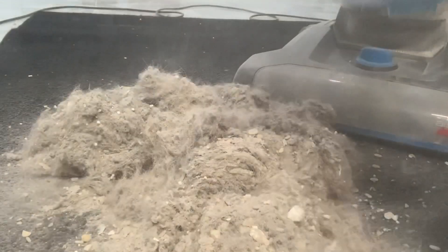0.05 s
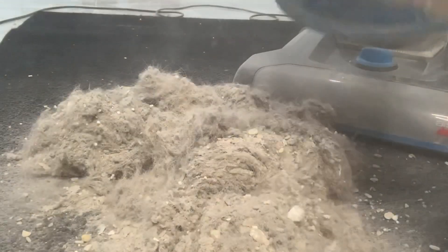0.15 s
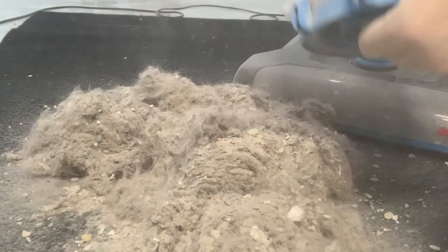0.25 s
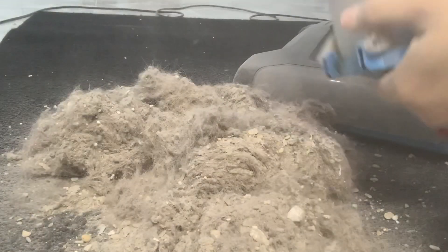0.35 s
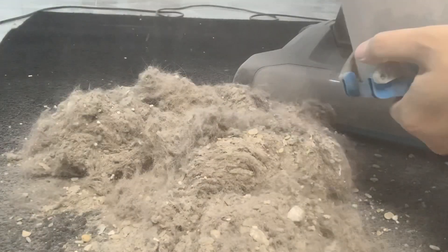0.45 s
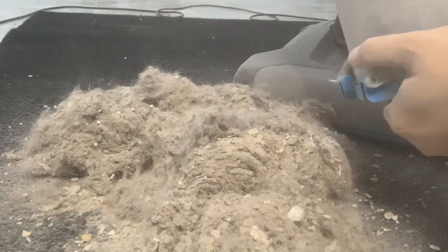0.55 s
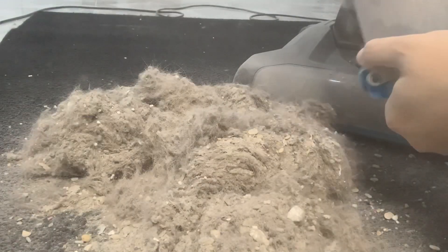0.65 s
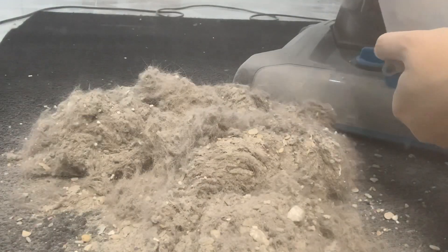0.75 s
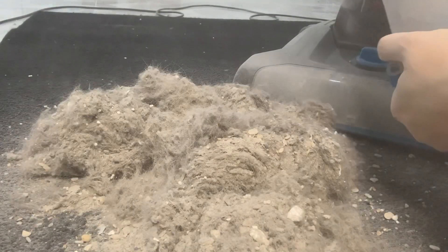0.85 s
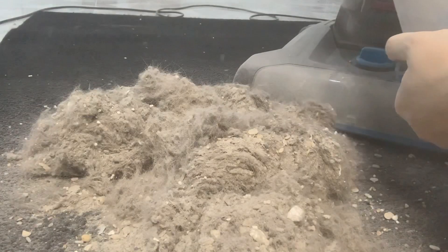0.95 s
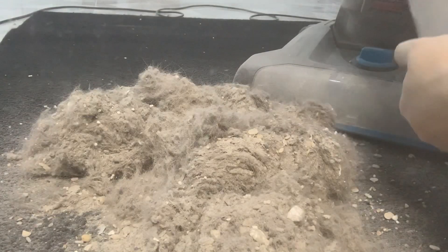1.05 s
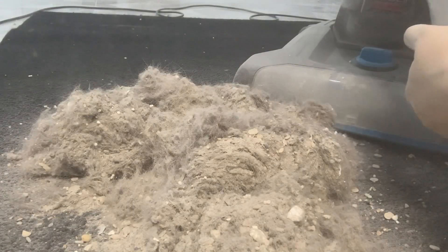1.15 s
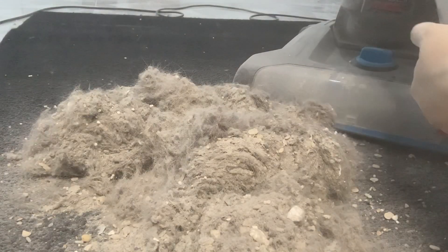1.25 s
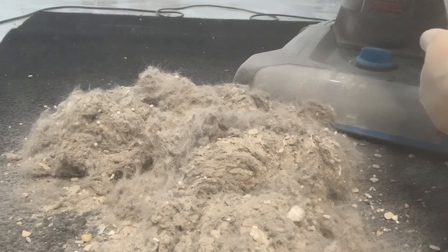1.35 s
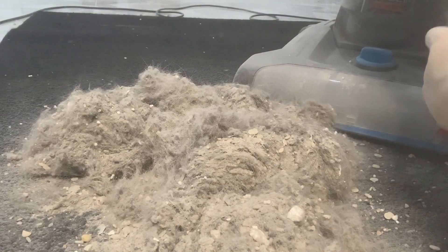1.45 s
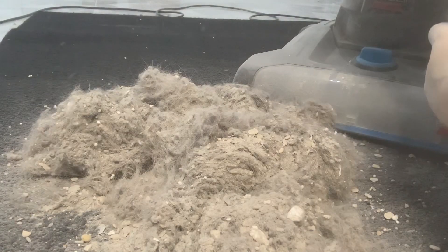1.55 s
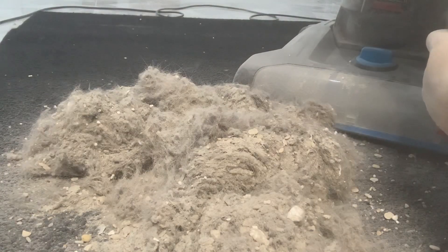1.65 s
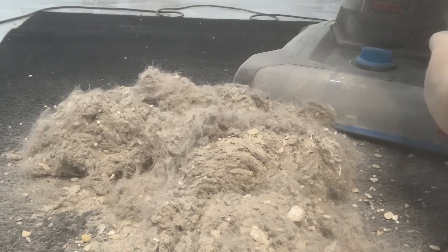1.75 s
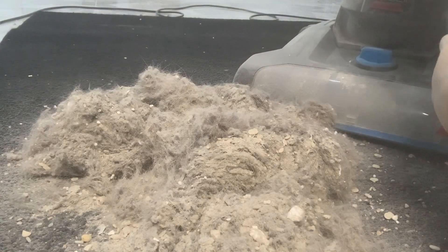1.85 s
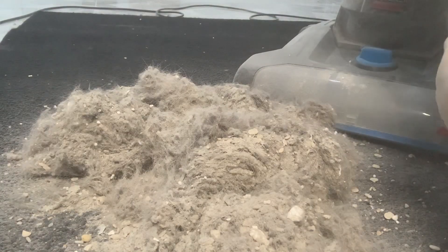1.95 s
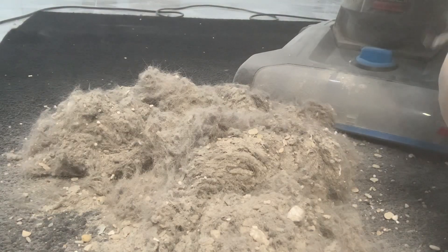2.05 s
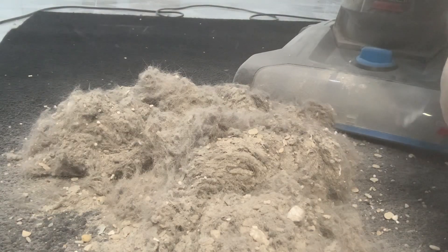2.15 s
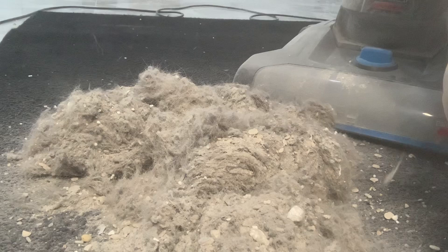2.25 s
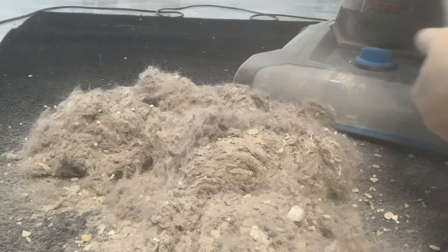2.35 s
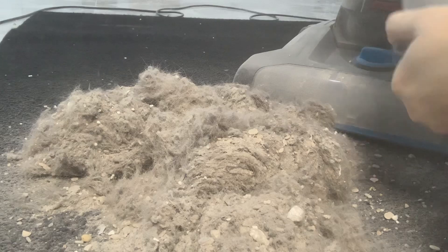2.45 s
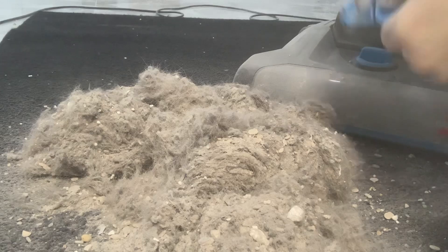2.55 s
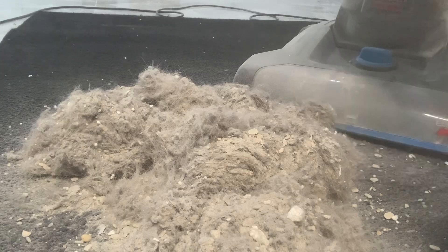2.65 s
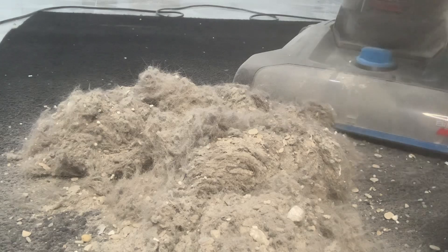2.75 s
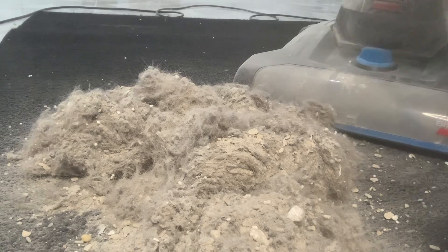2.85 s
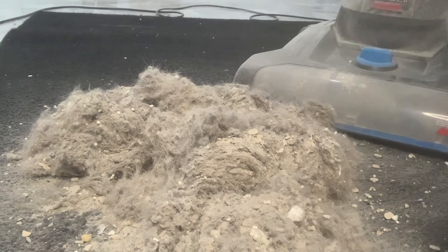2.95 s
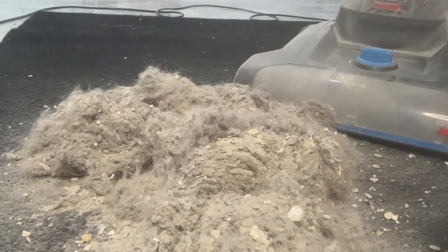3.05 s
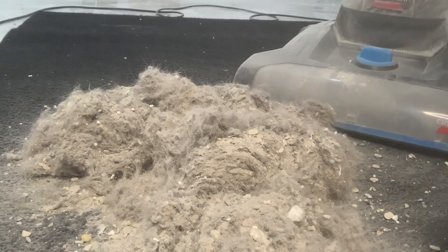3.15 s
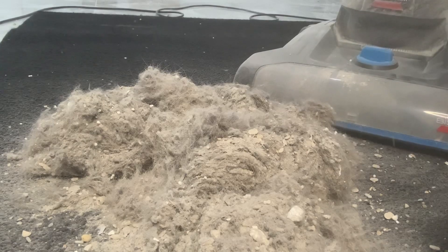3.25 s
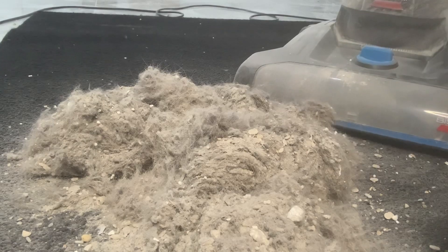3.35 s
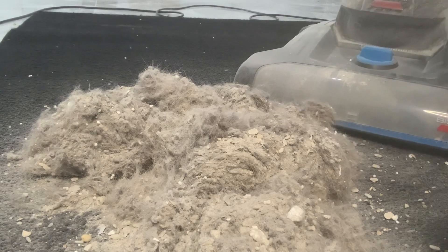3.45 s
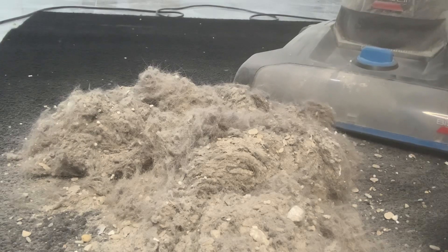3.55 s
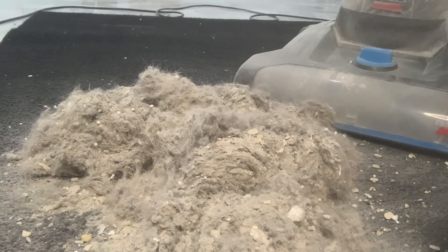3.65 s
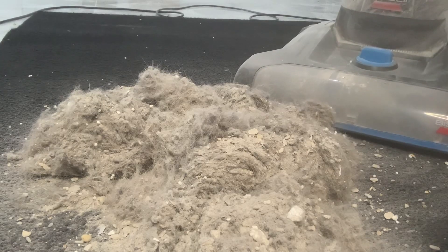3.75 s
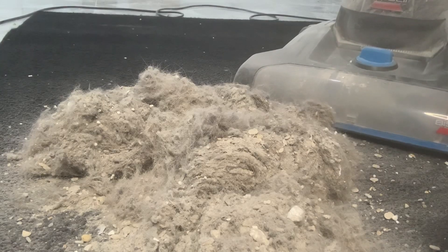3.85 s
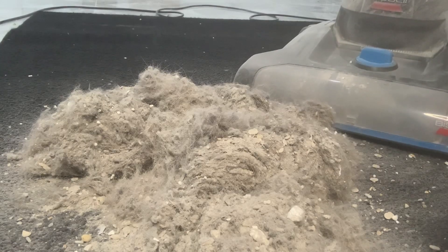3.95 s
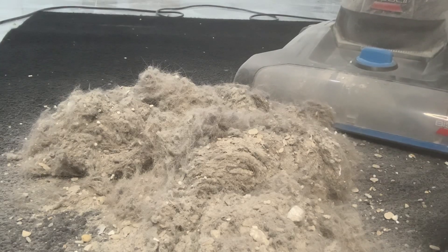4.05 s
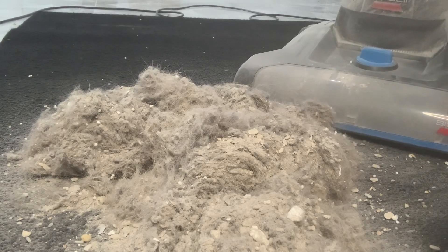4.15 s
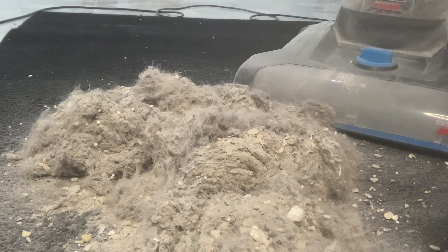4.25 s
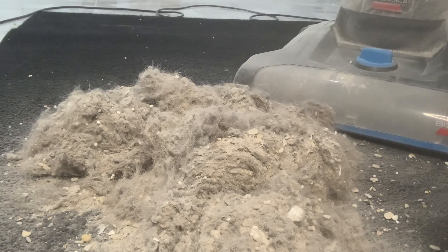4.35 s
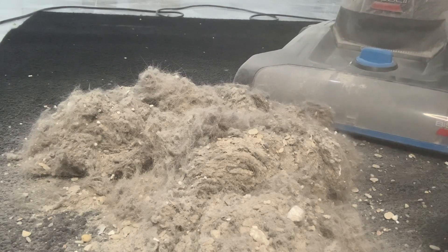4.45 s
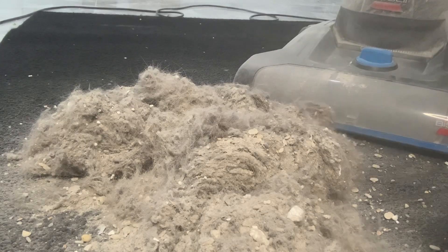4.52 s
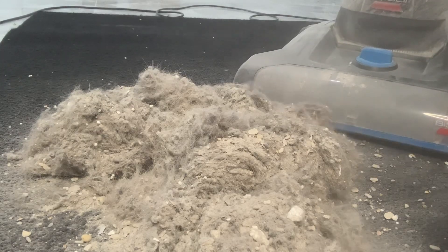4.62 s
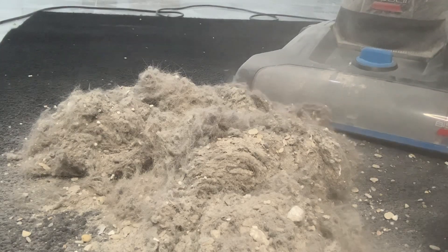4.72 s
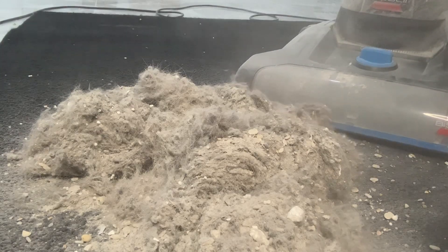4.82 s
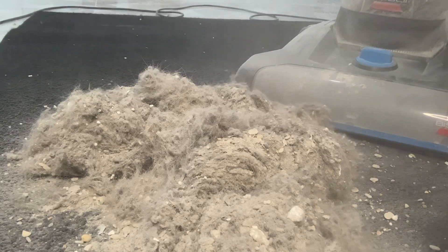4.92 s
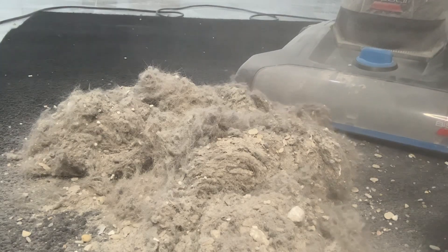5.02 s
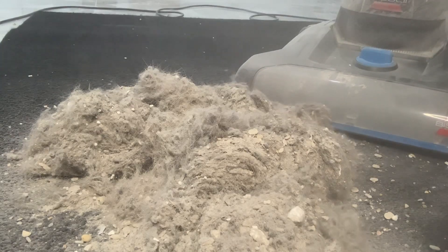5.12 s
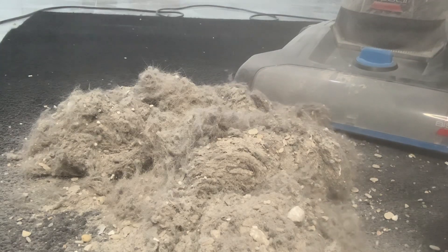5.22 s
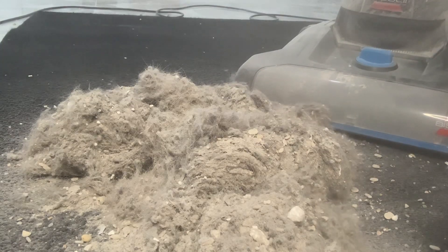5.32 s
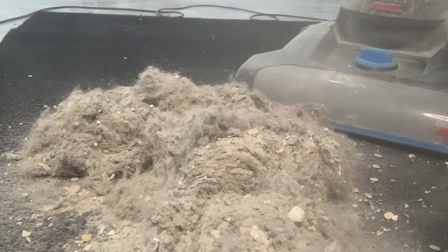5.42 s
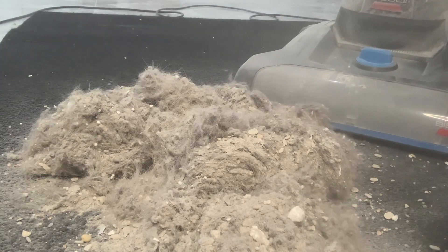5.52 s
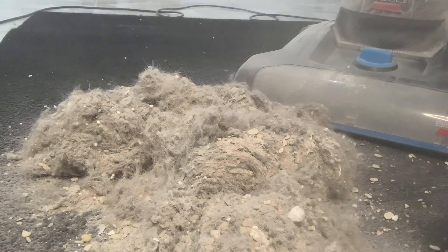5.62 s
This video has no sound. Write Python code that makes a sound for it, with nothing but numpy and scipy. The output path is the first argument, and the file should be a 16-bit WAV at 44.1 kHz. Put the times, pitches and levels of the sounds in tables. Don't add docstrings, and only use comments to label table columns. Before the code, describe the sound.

A quiet, bare room with faint hum and a live, hard echo, heard close by. From about 0.1 s a hollow plastic cup knocks sharply in a quick cluster, followed by soft taps and a dull bump near 0.7 s. Sparse knocks at 1.0 and 1.25 s lead to a flurry around 1.4-1.5 s, then firm clacks with low base thuds at 1.8 and 1.95 s and a stronger hollow knock at 2.15 s. After a lull, dull bumps and a heavy rub tumble together around 2.9-3.05 s. At 3.55-3.6 s comes the loudest event: a hard clack, a bright latch snap and a short spring rattle, ringing away. At 4.13 s a switch clicks; the motor crackles faintly and glides up within about a second to a steady, wavering whine over rushing, hissing air. A crumb ticks at 4.6 s, and from about 5.4 s the rush and whine ease slightly.

```python
import sys
import numpy as np
from scipy import signal
from scipy.fft import rfft, irfft
from scipy.io import wavfile
from scipy.ndimage import uniform_filter1d

SR = 44100
rng = np.random.default_rng(int(sys.argv[2]) if len(sys.argv) > 2 else 0)


def makeup_ratio(level_db):
    decades = np.asarray(level_db, float) / 20
    return 10 ** decades


def to_wav(sig):
    pcm = np.clip(np.atleast_2d(sig), -1, 1) * 32767
    pcm = np.round(pcm).astype(np.int16)
    wavfile.write(sys.argv[1], SR, pcm.T)


N = 250488

SWITCH_S, TOP_HZ = 4.133, 539.5
SAG_S = 5.38


def evened(x):
    return x / np.sqrt(np.mean(x ** 2) + 1e-20)


def read(points, hz):
    f, value = np.transpose(points)
    return np.interp(np.log(hz + 1), np.log(f + 1), value)


def curve(rows, t):
    s, *columns = np.transpose(rows)
    return [np.interp(t, s, c) for c in columns]


def add(mix, s, sound):
    part = mix[max(round(s * SR), 0):][:len(sound)]
    part += sound[:len(part)]


def resonate(x, hz, width):
    turn = np.exp(2j * np.pi * hz * np.arange(len(x)) / SR)
    r = np.exp(-np.pi * width / SR)
    return 2 * (turn * signal.lfilter([1 - r], [1, -r], x / turn)).real


def drift(rate):
    knots = rng.standard_normal(200)
    return uniform_filter1d(np.interp(np.arange(N) / SR * rate, np.arange(200), knots), 400)


def noise(field_db, patchy_db):
    frames, hz = N // 256 + 5, np.fft.rfftfreq(1024, 1 / SR)[:, None]
    a, b, patches = rng.standard_normal((frames, 513, 3)).T
    patches = evened(uniform_filter1d(uniform_filter1d(patches, 10, 0), 10, 1))
    level_db = field_db(hz, np.arange(frames) * 256 / SR) + patchy_db * patches
    return signal.istft((a + 1j * b) * makeup_ratio(level_db), nperseg=1024, noverlap=768)[1][:N]


def ring(hz, t60, t, rise):
    return np.sin(2 * np.pi * hz * t) * makeup_ratio(-60 * t / t60) * (1 - np.exp(-t / rise))


def room(x):
    # f/Hz, t60/s
    decay = [(100, 0.76), (260, 0.34), (700, 0.57), (1840, 0.54), (4850, 0.53), (9000, 0.43), (15000, 0.27)]
    taps, at = np.zeros(SR), np.arange(260, SR - 20, 20)
    taps[at + rng.integers(0, 20, len(at))] = rng.choice([-1., 1.], len(at))
    hz, t, z = signal.stft(taps, SR, nperseg=256)
    t60 = np.maximum(read(decay, hz), .05)[:, None]
    tail = signal.istft(z * makeup_ratio(-60 * t / t60), SR, nperseg=256)[1]
    return signal.fftconvolve(x, tail / np.linalg.norm(tail))[:N]


def air():
    # f/Hz, density/dB per Hz
    still = [(12, -39), (20, -4.5), (77, 1), (130, -1.5), (168, 0), (204, -1), (293, 0), (590, -11),
             (738, -9), (849, -14), (4060, -22.5), (5850, -28.5), (14700, -34), (16000, -41)]
    # f/Hz, rms/dB
    hums = [(71, -70), (120, -70.5), (745, -74.5)]
    t = np.arange(N) / SR
    tone = makeup_ratio(-58.5) * evened(noise(lambda hz, t: read(still, hz) + 0 * t, patchy_db=.8))
    for hz, db in hums:
        level = np.sqrt(2) * makeup_ratio(db + 2.0 * drift(3.8))
        tone = tone + level * np.sin(2 * np.pi * hz * t + drift(2.6))
    return tone


def knock(db, hz, crack_db, chance):
    # f/Hz, level/dB
    wall_colour = [(600, -10.5), (1200, 2), (1700, 0), (2700, 2.5), (4500, 1), (6000, -34), (9000, -7)]
    # f/Hz, level/dB re crack, t60/s
    shell = [(1650, -15, .022), (2520, -19, 0.028), (3530, -18, .012)]
    t = np.arange(5000) / SR
    cycles = np.maximum(12.0 - .5 * crack_db, 6)
    body = ring(hz, cycles / hz, t, 0.00039) + 0.34 * ring(1.2 * hz, 4.0 / hz, t, 0.00013)

    modes = np.geomspace(600, 9000, num=40) * (1 + .03 * chance[40:80])
    softness = .3 * min(crack_db + 3, 0)
    modes_db = read(wall_colour, modes) + softness * np.log2(modes / 1200)
    wall = np.zeros(1500)
    for f, g, c in zip(modes, modes_db, chance[100:140]):
        wall += makeup_ratio(g) * np.tanh(3 * c) * ring(f, np.sqrt(.1 / f), t[:1500], .0001)
    wall = wall + .4 * np.roll(wall, 90 + int(25 * abs(chance[1])))
    wall = wall + .25 * np.roll(wall, 210 + int(40 * abs(chance[2])))

    crack = np.pad(wall / abs(wall).max(), (0, len(t) - len(wall)))
    for (f, g, t60), c in zip(shell, chance[3:6]):
        crack += makeup_ratio(g) * ring(f * (1 + 0.037 * c), t60, t, 0.0001)
    return makeup_ratio(db) * (1.125 * body + makeup_ratio(crack_db + 5.0) * crack)


def hollow(db, hz, t60):
    return makeup_ratio(db) * ring(hz, t60, np.arange(9000) / SR, .003)


def tick(db, hz, chance):
    t = np.arange(len(chance)) / SR
    burst = .5 * resonate(chance, 5800, 4000) + 1.0 * resonate(chance, hz, 2400)
    return makeup_ratio(db) * .5 * burst * makeup_ratio(-60 * t / 0.0093)


def rub(length, db, dull_db):
    count = int(length * SR)
    slips = rng.standard_normal(9000)[:count]
    grip = uniform_filter1d(rng.standard_normal(9000), 90)[:count]
    slips = slips * makeup_ratio(0.76 * grip * 4.7)
    hz = np.fft.rfftfreq(len(slips), 1 / SR)
    tilt = makeup_ratio(-dull_db * np.log2(hz / 300 + 1)) * hz ** 2 / (hz ** 2 + 350 ** 2)
    slide = evened(irfft(rfft(slips) * tilt, len(slips)))
    return makeup_ratio(db) * slide * signal.windows.tukey(len(slips), .8)


def bump(db, hz, thud_db, chance):
    t = np.arange(5000) / SR
    burst = np.pad(chance * makeup_ratio(-60 * t[:len(chance)] / 0.035), (0, len(t) - len(chance)))
    band = signal.butter(2, [250, np.clip(hz, 300, 9000)], "band", fs=SR, output="sos")
    burst = signal.sosfilt(band, burst)
    push = ring(160 * (1 + 0.15 * chance[0]), 0.051, t, 0.0016)
    return makeup_ratio(db) * (burst / abs(burst).max() + makeup_ratio(thud_db) * push)


def thud(db, hz):
    return makeup_ratio(db) * ring(hz, 0.048, np.arange(5000) / SR, .0037)


def latch(db, hz, t60):
    return makeup_ratio(db) * ring(hz, t60, np.arange(2000) / SR, 0.00028)


def handling():
    # t/s, peak/dB, body ring f/Hz, crack/dB re peak
    knocks = [(0.089, -38.5, 346, -9.5), (0.115, -32.5, 304, -4.5), (0.148, -25, 680, -6),
              (1.0, -36, 585, -13), (1.01, -50, 660, 7.5), (1.251, -33, 460, -6.5), (1.35, -36.5, 324, -6),
              (1.396, -32.5, 592, -13.5), (1.407, -46, 267, -32), (1.419, -38, 704, -8),
              (1.436, -34.5, 247, -4), (1.487, -25, 727, -13), (1.783, -29, 596, -2),
              (1.79, -29.5, 660, -1), (1.803, -37.5, 323, -2), (1.938, -53, 680, -15),
              (1.958, -30, 530, -8.5), (1.987, -40, 663, -18), (2.151, -19, 598, -8.5),
              (3.38, -47, 870, -5), (3.557, -15, 628, -11.5), (3.569, -16.5, 484, -15),
              (3.578, -21.5, 720, -0.5), (3.582, -29, 540, -14), (3.589, -19.5, 474, 2.5),
              (4.135, -51, 440, 8.5)]
    # t/s, peak/dB, f/Hz, t60/s
    hollows = [(.118, -35, 330, .12), (.454, -35, 285, .08), (.503, -46, 285, .1), (.681, -39, 300, .07),
               (1.388, -39, 290, .07), (2.156, -33, 280, .25)]
    # t/s, peak/dB, centre f/Hz
    ticks = [(0.1508, -33.5, 2720), (0.6815, -71, 2590), (1.002, -50, 2600), (1.784, -43, 3950),
             (1.9623, -45, 2410), (2.1486, -40, 2570), (2.36, -48.5, 2070), (2.9203, -64, 2230),
             (3.3717, -41.5, 5000), (3.3797, -58, 6800), (3.578, -14.5, 4570), (3.5901, -17, 2330),
             (3.6108, -21, 3500), (3.6174, -47, 3180), (4.134, -30, 2760), (4.146, -52, 7090)]
    # t/s, length/s, level/dB, dullness/dB per octave
    rubs = [(0.51, 0.02, -62, 6.5), (0.989, 0.026, -48, 7.5), (1.371, 0.2, -72, 7.5),
            (1.763, 0.057, -43.5, 9.5), (1.932, 0.046, -48.5, 8), (2.044, 0.054, -59, 9.5),
            (2.103, 0.041, -46.5, 5.5), (2.501, 0.11, -66.5, 2), (2.588, 0.18, -68.5, 1),
            (2.918, 0.13, -40, 16), (3.08, 0.11, -60, 5), (3.375, 0.066, -70, 15),
            (3.768, 0.12, -56.5, 4.5)]
    # t/s, peak/dB, top of the colour f/Hz, thud/dB re peak
    bumps = [(.681, -31.5, 2150, -12.5), (1.070, -37, 1990, 1.5), (2.921, -37, 2300, -13),
             (2.93, -30, 1860, 0), (2.935, -26, 410, -5), (2.968, -29, 1170, -9), (2.977, -31, 1580, 5),
             (2.986, -46, 1480, -13), (2.993, -33, 620, 5.5), (3.009, -27.5, 980, 1),
             (3.015, -26.5, 790, -14), (3.025, -20.5, 740, -6), (3.032, -29, 1110, -12),
             (3.505, -41.5, 700, -1)]
    # t/s, peak/dB, f/Hz
    thuds = [(1.397, -42, 150), (1.487, -35, 153), (1.785, -28.5, 163), (1.792, -23, 165),
             (1.937, -31, 151), (1.959, -20.5, 152), (1.988, -26.5, 155), (2.154, -26, 180),
             (3.558, -17, 150), (3.57, -37, 165), (3.591, -22, 131)]
    # t/s, peak/dB, f/Hz, t60/s
    latches = [
        (3.5901, -13, 2460, 0.0085),
        (3.5908, -17, 3340, .007),
        (3.5909, -18, 1445, 0.014),
        (3.601, -21, 1650, 0.018),
        (3.625, -22, 1460, 0.019),
    ]
    # t/s, room share/dB
    room_share = [(.1, -3.5), (1.0, -8), (1.4, -3), (1.49, -7.5), (1.79, -9), (1.96, -7.5), (2.15, -9),
                  (2.95, -3.5), (3.57, -3.5)]

    contacts = []  # (t/s, sound, room share/dB)
    for (s, db, hz, crack_db), chance in zip(knocks, rng.standard_normal((len(knocks), 200))):
        contacts.append((s + 0.001394, knock(db, hz, crack_db, chance), *curve(room_share, s)))
    for (s, db, hz, thud_db), chance in zip(bumps, rng.standard_normal((len(bumps), 700))):
        contacts.append((s, bump(db, hz, thud_db, chance), *curve(room_share, s)))
    for (s, db, hz), chance in zip(ticks, rng.standard_normal((len(ticks), 500))):
        contacts.append((s, tick(db, hz, chance), 3.0))
    contacts += [(s, hollow(*row), -10) for s, *row in hollows]
    contacts += [(s, rub(*row), -5.0) for s, *row in rubs]
    contacts += [(s, thud(*row), *curve(room_share, s)) for s, *row in thuds]
    contacts += [(s, latch(*row), -3.0) for s, *row in latches]

    direct, sent = np.zeros(N), np.zeros((3, N))
    for k, (s, sound, wet_db) in enumerate(contacts):
        add(direct, s, sound)
        add(sent[k % 3], s, makeup_ratio(wet_db) * sound)
    return direct + sum(room(part) for part in sent)


def sparks():
    # f/Hz, width/Hz, level/dB
    arcs = [(2600, 780, 1.5), (3500, 470, -3), (6630, 1000, 3.5), (10200, 1500, -8), (13900, 1000, -22)]
    t = np.arange(SR // 4) / SR
    crackle = rng.standard_normal(len(t))
    crackle = crackle * makeup_ratio(3.9 * evened(uniform_filter1d(rng.standard_normal(len(t)), 120)))
    colour = np.zeros(len(t))
    for hz, width, db in arcs:
        colour += makeup_ratio(db) * evened(resonate(resonate(crackle, hz, width), hz, width))
    out = np.zeros(N)
    add(out, SWITCH_S, makeup_ratio(-56 - 60 * t / 1.0) * colour)
    return out


def speed(t):
    # gap/Hz, time constant/s
    run_up = [(466, .215), (73, .09)]
    since = np.maximum(t - SWITCH_S, 0)
    return TOP_HZ - sum(gap * np.exp(-since / tau) for gap, tau in run_up)


def standing_db(waves, hz):
    return sum(db / (1 + (2 * (hz - centre) / width) ** 2) for centre, width, db in waves)


def motor():
    # f/Hz, width/Hz, level/dB
    standing = [(267.8, 23.4, -10.2), (391.4, 100, 8.8), (404.3, 13.6, -6.3), (445, 25, 2.5),
                (468, 8, -2.5), (477.5, 25, 7), (489.8, 7.5, -15), (507.3, 20, 14), (509.4, 4.2, -8.3),
                (517.1, 1.2, -4), (520.3, 3, 2), (527.4, 12.9, 9.6), (531.9, 1.3, -4.4), (534.9, 3.7, 4.2)]
    # f/Hz, width/Hz, level/dB
    standing_overtones = [(300, 50, 6), (352, 30, 12), (362.5, 4, -10), (1006, 20, 6), (1075.4, 3.6, 12.5),
                          (3250, 800, 7), (4660, 150, 6)]
    # shaft order, rms/dB at full speed, growth/dB per octave of speed, unsteadiness/dB
    overtones = [(2, -47.5, 12, 2), (9, -45.5, 24, 2.5), (.4495, -49, 50, 1), (.676, -52, 20, 1.5),
                 (12, -57, 5, 2.5)]
    # shaft order, rms/dB
    faint = [(.229, -55.5), (1.268, -47), (1.528, -53), (2.227, -51), (2.427, -50), (2.548, -48),
             (2.677, -46), (2.998, -50)]
    t = np.arange(N) / SR
    since = np.maximum(t - SWITCH_S, 0)
    hz = speed(t)
    octaves = np.log2(hz / TOP_HZ)
    turns = 2 * np.pi * np.cumsum(hz) / SR
    running = np.clip(since / 0.035, 0, 1)

    whine_db = -28.9 + 12.7 * octaves - 4 * np.maximum(t - SAG_S, 0)
    whine_db = whine_db + standing_db(standing, hz) + .4 * drift(18)
    whine = np.clip(since / .1, 0, 1) ** 2 * makeup_ratio(whine_db) * np.sin(turns)
    tones = whine + makeup_ratio(-27) * room(whine)
    for k, db, growth_db, waver_db in overtones:
        db = db + growth_db * octaves + standing_db(standing_overtones, k * hz)
        tones += running * makeup_ratio(db + waver_db * drift(30)) * np.sin(k * turns + .35 * drift(20))
    settled_db = -.5 - .5 * (TOP_HZ - hz)
    for k, db in faint:
        tones += makeup_ratio(db + settled_db + 3 * drift(10)) * np.sin(k * turns + .6 * drift(12))

    boom_db = -56 + 10 * np.exp(-(since / 0.37) ** 4) + 1.3 * drift(6.5)
    boom = makeup_ratio(boom_db) * np.sin(2 * np.pi * 146 * t + 0.47 * drift(12))
    return np.sqrt(2) * (tones + running * boom)


def airflow():
    # f/Hz, density/dB per Hz
    rush = [(50, -30), (120, -12), (190, -17.5), (450, 4), (700, 0.5), (1400, 0), (2200, -4), (4200, -3),
            (5900, -5.5), (6900, -3), (7800, -9), (12000, -14), (14500, -14.5), (16000, -16)]
    # centre f/Hz, level/dB at full speed, growth/dB per octave of speed
    flow_layers = [
        (840, 1, 6),
        (2740, -1, 9),
        (6960, 2, 24),
        (10400, 4, 20.5),
    ]

    def field_db(hz, t):
        places = np.log([row[0] for row in flow_layers])
        octaves = np.log2(np.maximum(speed(t) / TOP_HZ, .2))
        level_db = read(rush, hz) - 5.5 * np.maximum(t - SAG_S, 0)
        for one_layer, (_, db, growth_db) in zip(np.eye(4), flow_layers):
            share = np.interp(np.log(hz + 1), places, one_layer)
            level_db = level_db + share * (db + growth_db * octaves)
        return level_db

    since = np.arange(N) / SR - SWITCH_S
    return makeup_ratio(-49.5) * noise(field_db, patchy_db=-1.27) * np.clip(since / 0.022, 0, 1)


def crumb():
    out, t = np.zeros(N), np.arange(600) / SR
    flick = resonate(rng.standard_normal(600), 3600, 1500) * makeup_ratio(-60 * t / .025)
    add(out, 4.583, makeup_ratio(-28) * 3 * flick)
    return out


def scene():
    near = signal.sosfilt(signal.butter(2, 105, "high", fs=SR, output="sos"), handling())
    mono = air() + near + sparks() + motor() + airflow() + crumb()
    return np.array([mono, mono])


def low_pass(x):
    return signal.sosfilt(signal.butter(12, 16480, fs=SR, output="sos"), x)


def record(dry):
    band_limit = signal.firwin(1023, 15780, window=("kaiser", 9), fs=SR)
    limited = signal.oaconvolve(dry, band_limit[None], "same")
    return low_pass(limited)


dry = scene()
out = record(dry)
to_wav(out)
```